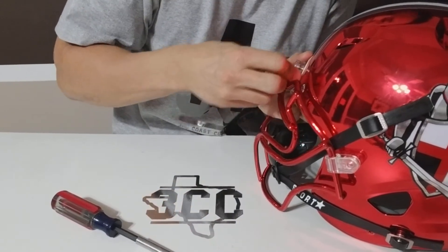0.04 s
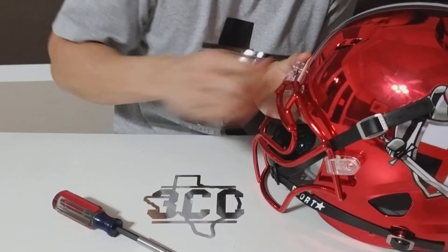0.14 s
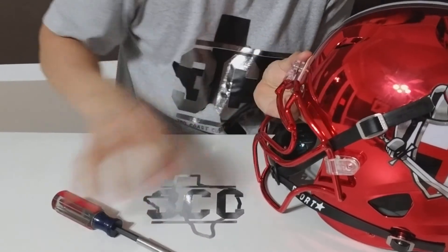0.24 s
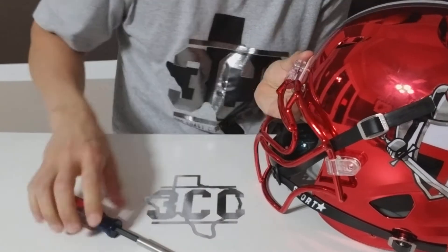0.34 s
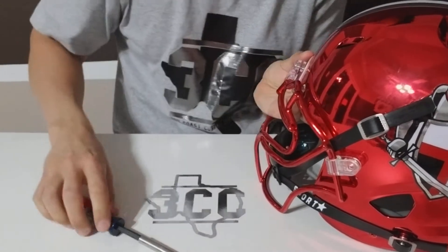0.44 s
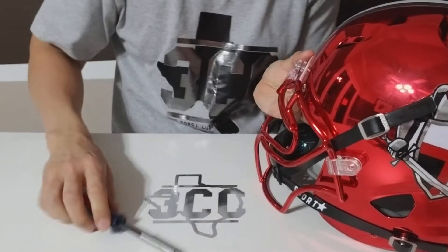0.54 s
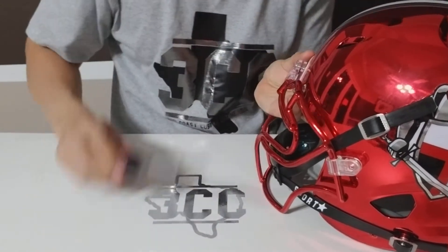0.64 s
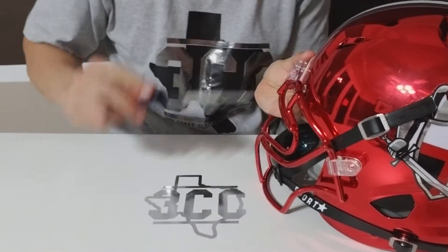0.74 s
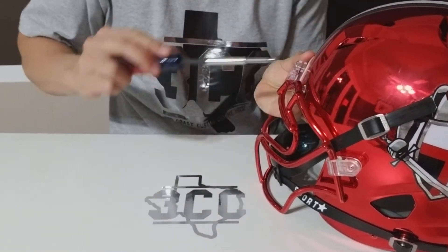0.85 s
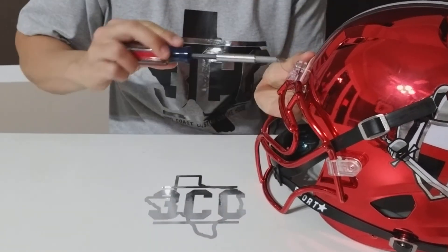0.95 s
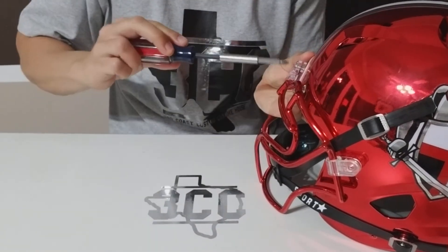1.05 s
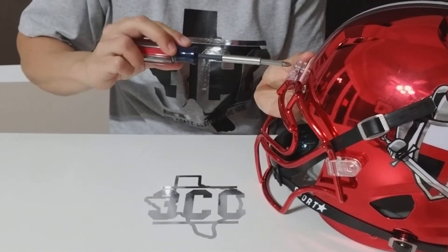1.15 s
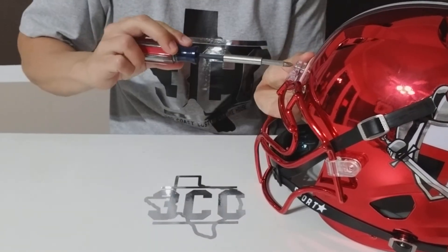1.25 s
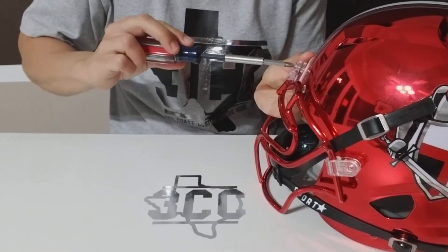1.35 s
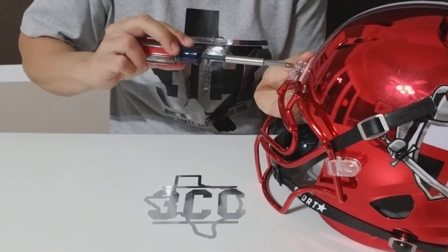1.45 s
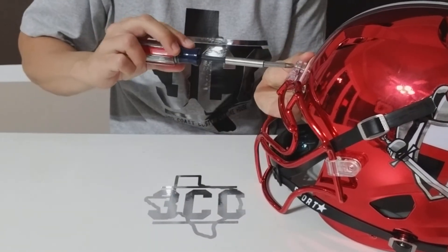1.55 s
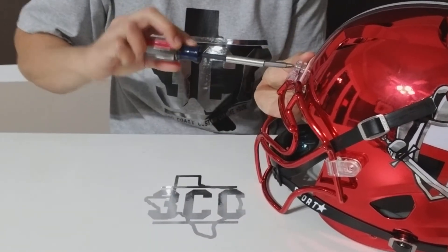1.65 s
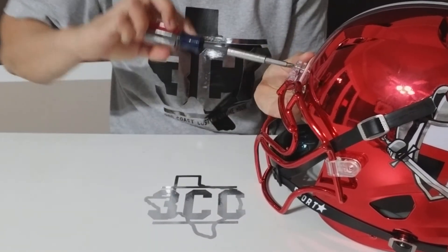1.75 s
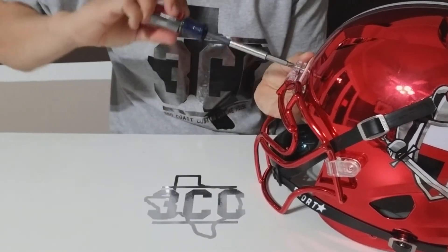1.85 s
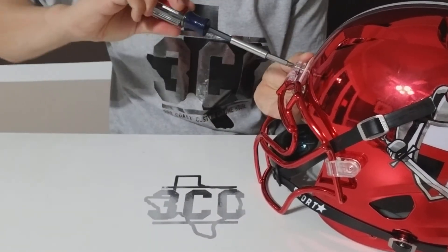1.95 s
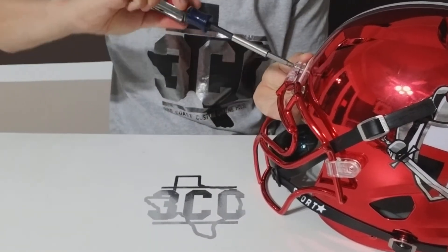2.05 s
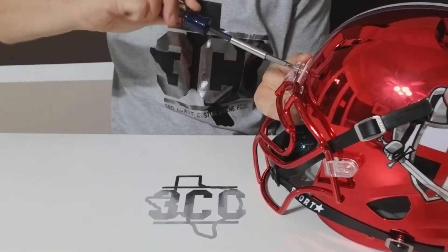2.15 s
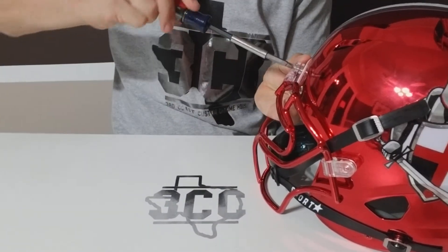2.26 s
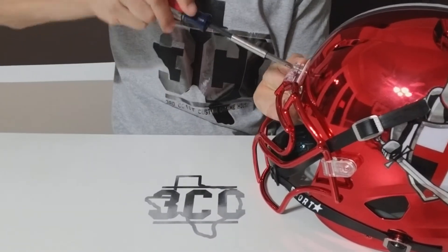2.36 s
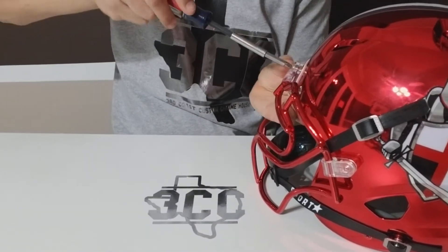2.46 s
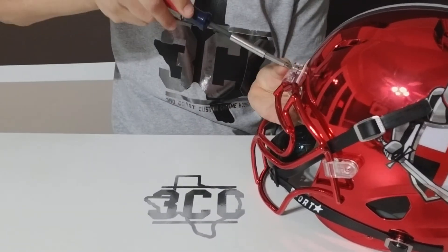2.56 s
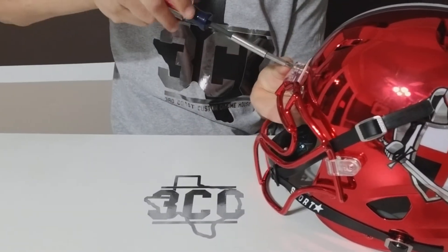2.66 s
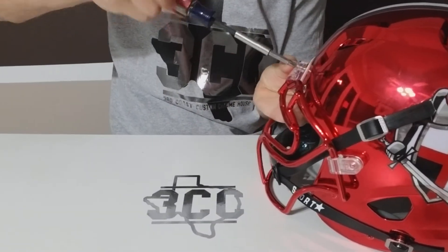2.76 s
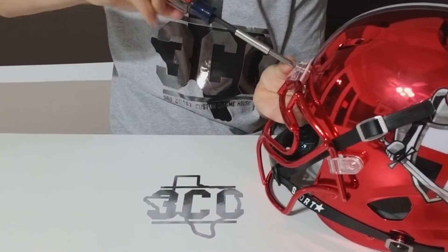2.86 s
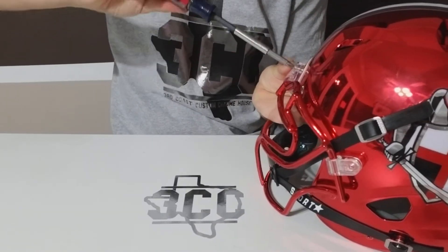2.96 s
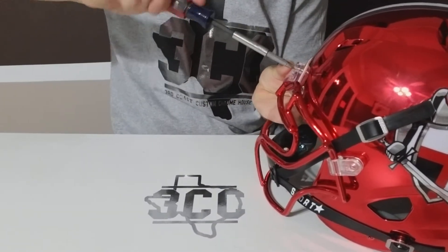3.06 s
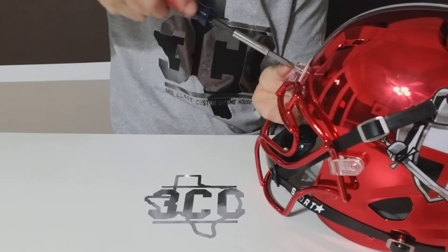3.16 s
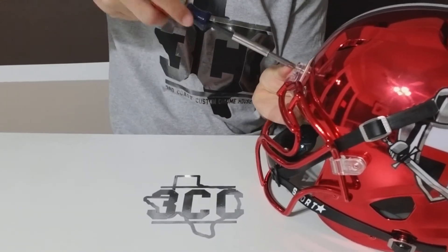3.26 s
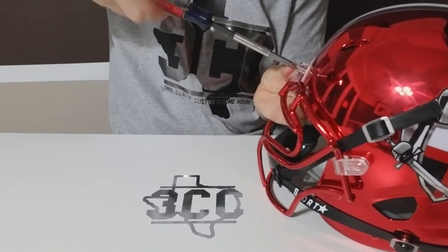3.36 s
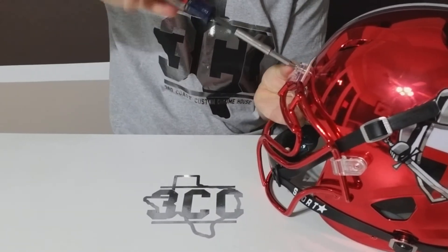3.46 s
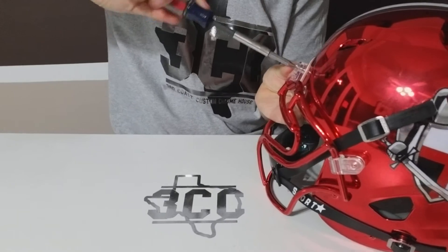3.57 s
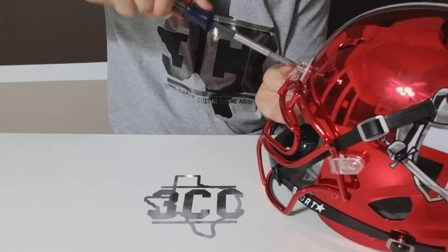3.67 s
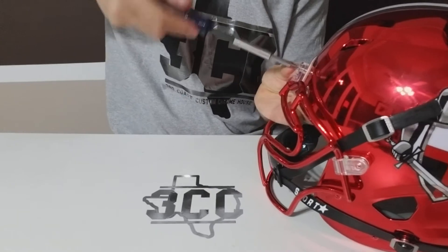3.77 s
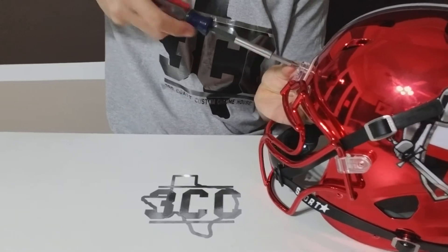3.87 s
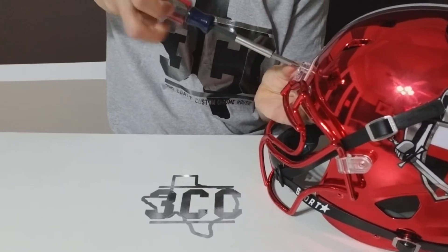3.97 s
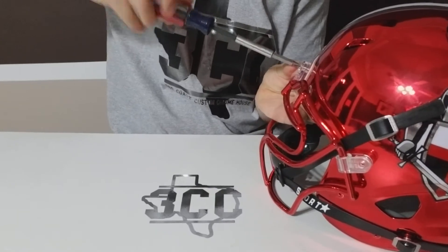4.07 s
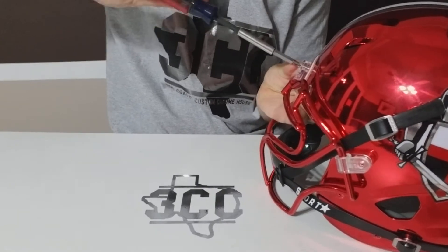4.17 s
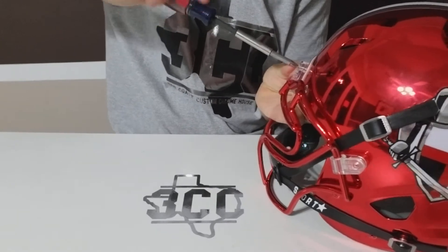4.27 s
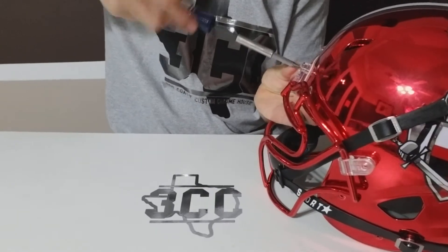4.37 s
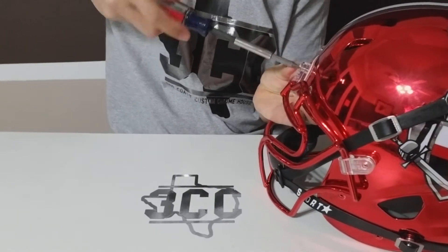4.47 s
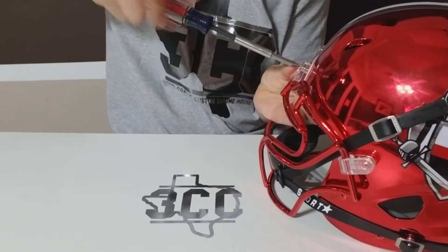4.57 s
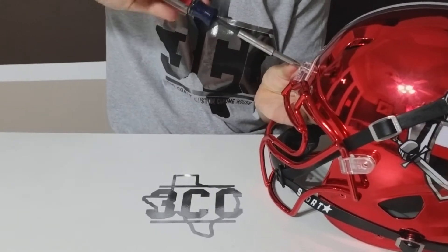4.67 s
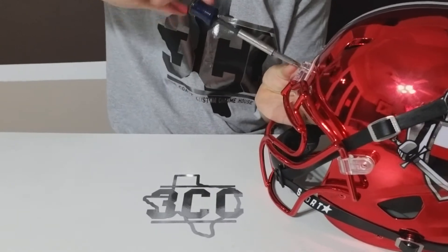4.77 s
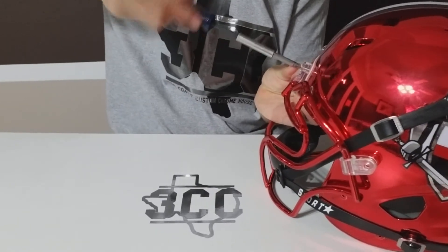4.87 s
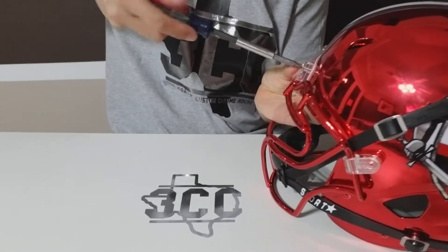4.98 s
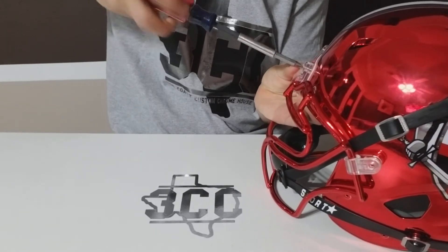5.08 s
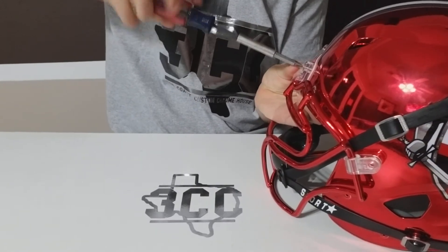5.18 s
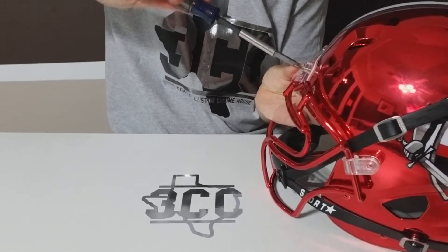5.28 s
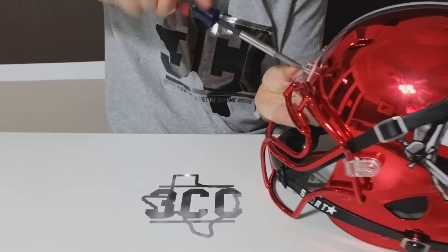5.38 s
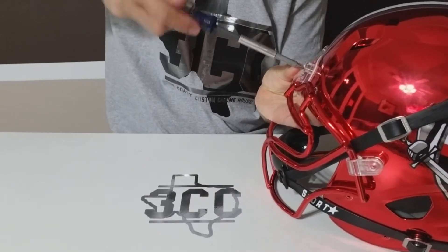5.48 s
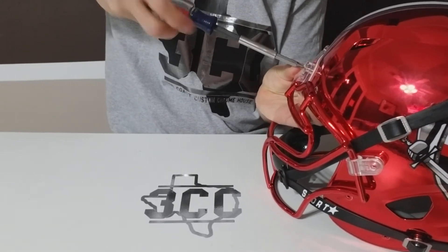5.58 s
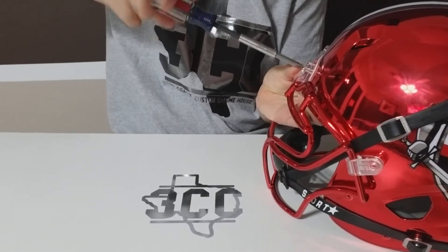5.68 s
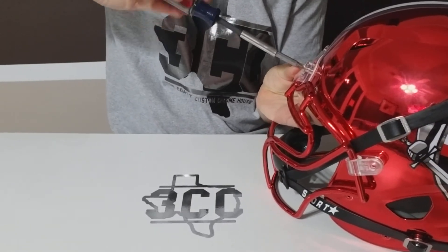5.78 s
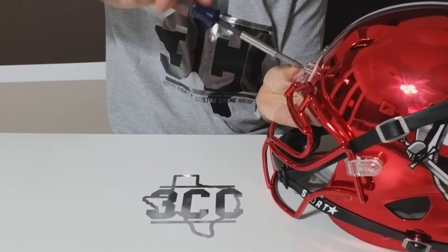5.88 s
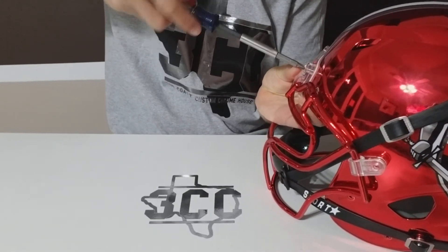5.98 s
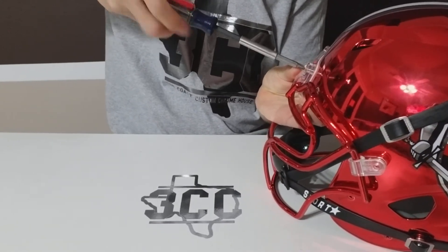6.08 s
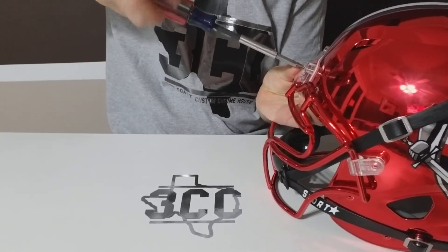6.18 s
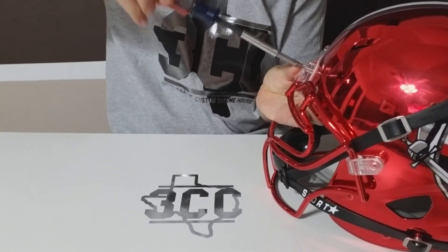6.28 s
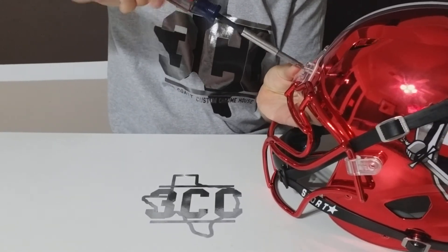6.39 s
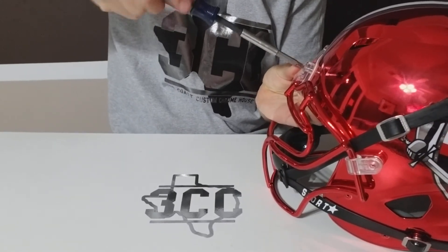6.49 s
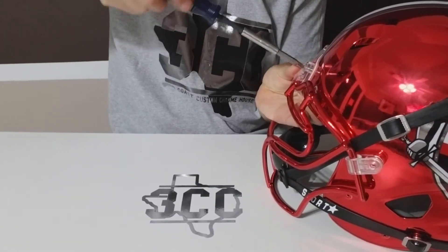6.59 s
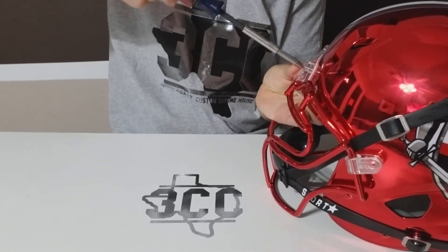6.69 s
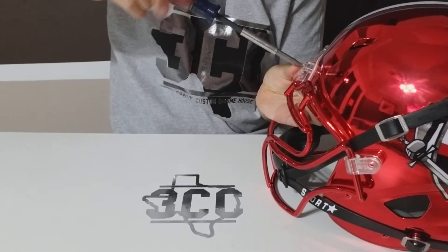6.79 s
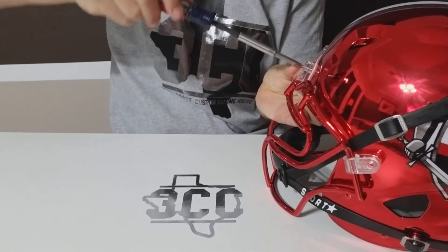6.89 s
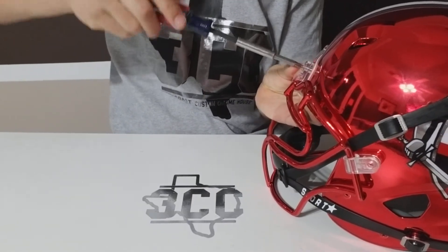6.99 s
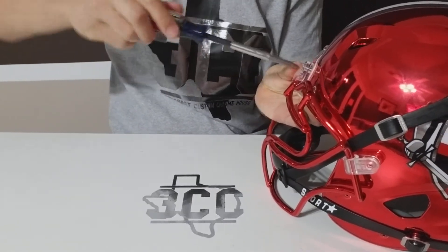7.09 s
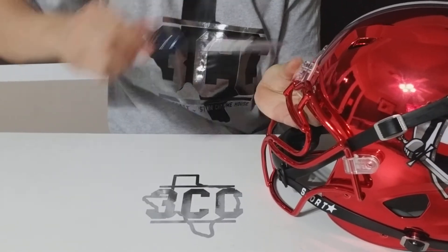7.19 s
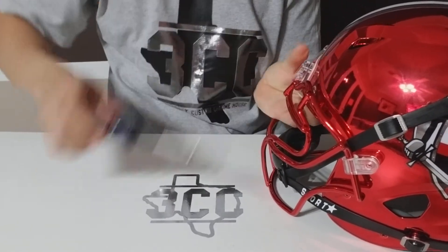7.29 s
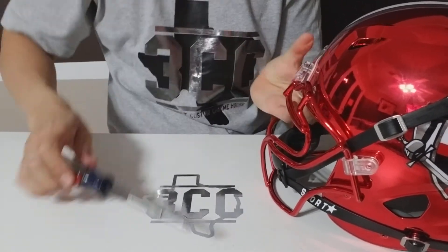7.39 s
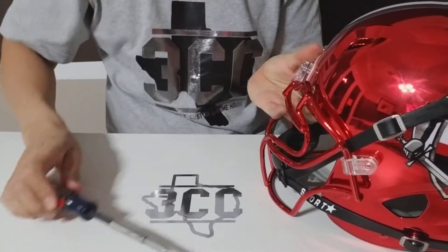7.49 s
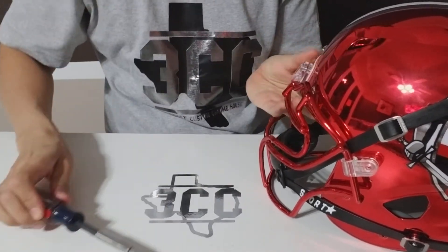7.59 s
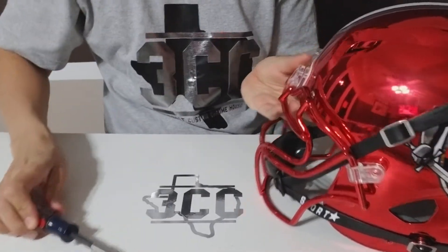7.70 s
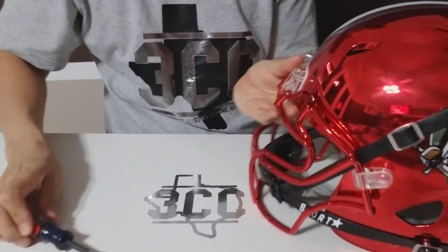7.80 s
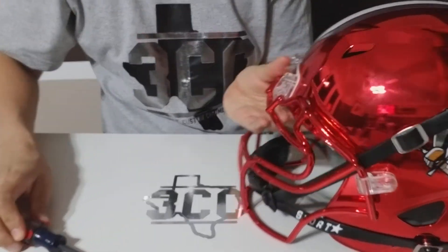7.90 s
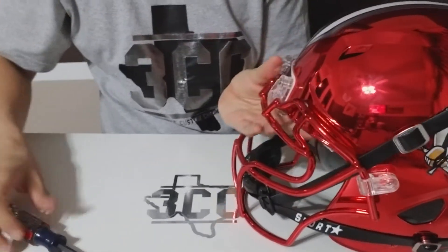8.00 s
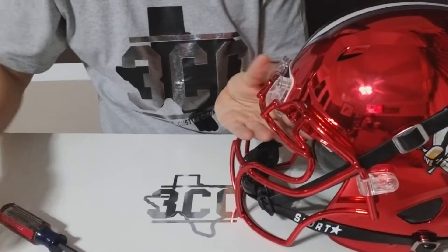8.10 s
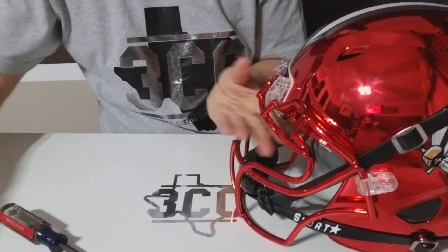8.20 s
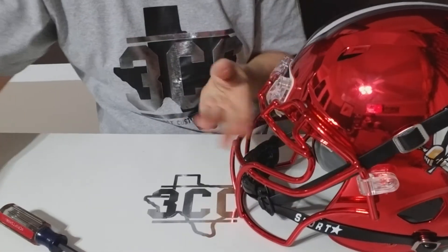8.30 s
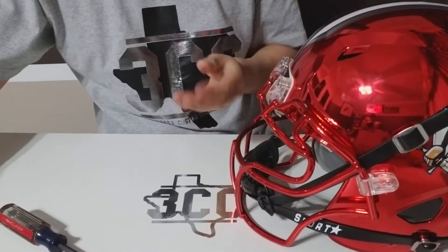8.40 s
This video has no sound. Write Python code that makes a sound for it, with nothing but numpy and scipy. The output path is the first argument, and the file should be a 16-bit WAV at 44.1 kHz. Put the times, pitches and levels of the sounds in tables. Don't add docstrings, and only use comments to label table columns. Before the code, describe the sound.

A screwdriver is picked up from a hollow table, scrapes and clicks a screw into a plastic helmet clip, then drops back with a ringing clatter.

```python
import sys
import numpy as np
from scipy import signal
from scipy.fft import rfft, irfft
from scipy.io import wavfile

SR = 44100
rng = np.random.default_rng(int(sys.argv[2]) if len(sys.argv) > 2 else 0)


def gain_from_db(level_db):
    decades = np.asarray(level_db, float) / 20
    return 10 ** decades


def int16_out(signal):
    q = np.round(np.clip(np.atleast_2d(signal).T, -1, 1) * 32767)
    wavfile.write(sys.argv[1], SR, q.astype(np.int16))


N = 372644
DECADES = np.log(1000)
SIDE = np.array([[0.5], [-0.5]])


def level(x, db):
    return x * gain_from_db(db) / np.sqrt(np.mean(x ** 2))


def colour(x, spectrum):
    hz, db = np.transpose(spectrum)
    grid = np.linspace(1, SR / 2, 2049)
    log_gain = np.interp(np.log(grid), np.log(np.maximum(hz, 1)), db) * DECADES / 60
    cepstrum = irfft(log_gain)
    cepstrum[1:2048] *= 2
    cepstrum[2049:] = 0
    h = irfft(np.exp(rfft(cepstrum)))
    return signal.oaconvolve(x, h / np.sqrt(np.sum(h ** 2)))[:len(x)]


def ring(x, modes, share=1):
    t = np.arange(SR // 4) / SR
    h = np.zeros(len(t))
    for k, (hz, db, t60) in enumerate(modes):
        fade = np.exp(-DECADES * t / (min(t60, 0.2) * share))
        h += (-1) ** k * gain_from_db(db) * np.sin(2 * np.pi * hz * t) * fade
    return signal.oaconvolve(x, h / np.abs(h).max())[:len(x)]


def strikes(s, db):
    x = np.zeros(N)
    np.add.at(x, np.minimum((np.asarray(s) * SR).astype(int), N - 1), gain_from_db(np.asarray(db)))
    return x


def burst(x, t60):
    fall = np.exp(-DECADES / (t60 * SR))
    rise = fall ** 8
    envelope = signal.lfilter([1.4 * (1 - rise)], np.convolve([1, -fall], [1, -rise]), x)
    return envelope * rng.standard_normal(len(x))


def grains(rate, spread_db, t60):
    size = np.minimum(rng.exponential(size=N), 4)
    starts = rng.random(N) < rate / SR
    return level(burst(starts * gain_from_db(spread_db * size), t60), 0)


def swells(s, rise, fall, db):
    swell_db = 25
    t = np.arange(0, N, 64) / SR
    late = t[:, None] - s
    efforts = db - swell_db * np.maximum(late / np.abs(fall), -late / np.abs(rise))
    return np.interp(np.arange(N) / SR, t, np.max(efforts, axis=1))


# [fastest t/s, rise t/s, fall t/s, scrape level/dB, brightness level/dB]
TWISTS = [(0.6, 0.28, 0.61, -72, 3), (1.955, .03, .1, -74, 14), (2.0, 0.052, 0.37, -52.5, -5),
          (2.33, 0.04, 0.14, -63.5, -8), (2.798, 0.19, 0.14, -75, -2), (2.99, 0.22, 0.32, -59.5, 2),
          (3.2, .5, 1, -75.5, 2), (3.671, 0.41, 0.18, -55.5, -2), (4.298, 0.22, 0.25, -58.5, -2),
          (4.75, .1, 0.066, -68, 8), (4.793, 0.2, 0.13, -56, 7), (5.193, 0.048, 0.61, -64, -10),
          (5.338, 0.33, 0.56, -65, 2), (5.713, 0.021, 0.39, -64.5, 14), (5.859, 0.11, 0.083, -48, -9),
          (6.226, 0.066, 0.45, -64, -11), (6.402, 0.42, 0.15, -83, 22), (6.64, .04, 0.32, -70.5, 10),
          (6.735, 0.067, 0.12, -63, 16.5), (6.994, 0.067, 0.09, -63, -17), (7.706, 0.02, 0.19, -43.5, -9)]
# [t/s, peak level/dB, brightness level/dB, shaft ring
# level/dB]
SLIPS = [(0.0005, -50, -15, -25), (1.966, -43, 5, 12), (2.0146, -45, -20, 5), (2.031, -32, -8.5, 0.5),
         (2.042, -36.5, -28, -0.5), (2.81, -41, -15, -15), (2.966, -57, 7, 11), (3.0089, -45, -24, 6),
         (3.079, -35.5, -8, -42), (3.394, -51.5, -3.5, 13), (3.6153, -47, -1, -20), (3.619, -44, -6, -12),
         (3.6485, -34.5, -8, -1), (3.6659, -34, -11, 14), (4.231, -49.5, -1, 22), (4.2605, -62, 15.5, -21),
         (4.2722, -43.5, -20, 2), (4.291, -46.5, 9, 2), (4.301, -64, 11, -10), (4.763, -36.5, -13, 6),
         (4.773, -30, -6.5, 1), (4.788, -41.5, -33, -6), (4.831, -46, -6, -1), (5.3068, -47, -6, 17),
         (5.343, -45.5, -1.5, 25), (5.4196, -55.5, 4, -29), (5.856, -35, 0.5, 16),
         (5.9627, -50.5, 6.5, -15.5), (6.203, -43, -28, -5), (6.423, -44.5, -10.5, -4),
         (6.629, -47.5, -6.5, -9), (6.6757, -38, -16, -14), (6.724, -47, 11, 1),
         (1.446, -69, -15, 1), (1.605, -73, -20, 2), (1.622, -63.5, -17, 7), (1.698, -63.5, -15, 19),
           (2.274, -67.5, -2, -5), (2.763, -50.5, -9, -14), (2.956, -57, -1, -5), (3.232, -60, -10, 3),
           (3.301, -59, -8, -5), (3.382, -56, -5, 1), (3.606, -58, -7, -5), (4.392, -57, -5, 0),
           (2.326, -59.5, -3, -5), (4.661, -59, -14, 4), (4.683, -61, -13, 5), (4.742, -67, -15, 10),
           (4.805, -55, -8, -7), (5.372, -63, 1, -2), (5.752, -59, 4, -5), (1.3146, -60, -31, 10),
           (2.3155, -48, -25, -5), (2.9277, -50.5, -22, 20.5), (2.989, -61, 9, -3), (3.048, -52, -4, 7),
           (3.0622, -53, 4, -18), (3.684, -44.5, -16.5, 0), (3.8038, -54, -8, -12), (4.131, -54, -4, -14),
           (4.195, -53.5, -9, -6), (4.93, -52, -19, -1), (5.175, -51.5, -24, 13), (5.333, -50, 2, -15),
           (5.366, -44.5, 1.5, -22), (5.471, -56.5, -23, 15), (5.851, -42, -3, 3), (5.871, -56, 1, 5),
           (6.309, -47, -21, -5), (6.3663, -50, -9, -1), (6.397, -54.5, 9, -6), (6.52, -62, -15, 0),
           (6.684, -42.5, -11, -7.5), (6.973, -55, -14, -8), (7.009, -65.5, -14, -3), (7.11, -64.5, 7, -18)]
# [t/s, peak level/dB]
PINGS = [(2.0296, -24), (2.045, -61), (2.761, -49), (2.965, -40.5), (3.0765, -45), (3.396, -73),
         (3.648, -26.5), (3.8035, -43), (4.231, -42), (4.271, -31.5), (4.29, -33.5), (4.299, -39),
         (4.339, -32.5), (4.7711, -28.5), (5.346, -31.5), (5.3666, -53), (5.4185, -35.5), (5.8555, -28.5),
         (5.963, -36.5), (6.424, -54)]
# [t/s, peak level/dB]
SHAFT_BLOWS = [
    (1.967, -45),
    (2.03, -38),
    (2.045, -29.5),
    (2.068, -52),
    (2.81, -54),
    (3.649, -56),
    (3.667, -60),
    (4.786, -34.5),
    (5.872, -46),
]
# [f/Hz, level/dB]
SPIT = [(1500, -21), (3000, -2), (4500, 2), (5800, -1.5), (7000, 0.5), (8600, -5), (9800, -3.5),
        (13000, -17)]
# [f/Hz, level/dB]
SCRAPE = [(1500, -22), (3000, -10), (4000, 3.5), (5500, -1.5), (7300, 3.5), (8600, -4.5), (9800, 0.5),
          (13000, -15.5)]
# [f/Hz, level/dB]
FIZZ = [(7000, -15), (10000, 0), (12500, 0.5), (14500, -1), (15400, -1), (16200, -24), (17000, -48.5)]
# [f/Hz, level/dB]
SQUEAK = [(7000, -27.5), (9600, -12.5), (11000, -2), (13000, -2), (14500, -5.5), (15800, -9), (16700, -43)]
# [f/Hz, level/dB, t60 t/s]
TIP = [(8650, 0, 0.006), (3600, -6, .004), (9300, -8, .004), (6800, -9, .004)]
# [f/Hz, level/dB, t60 t/s]
SHAFT = [(1950, -20, .008), (2560, -20, 0.018), (2440, -12, 0.009), (4200, -22, .008)]
# [f/Hz, level/dB]
SCUFF = [(2000, -9), (3000, -14), (3800, 1.5), (4600, 0.5), (5800, -9.5), (7000, -21), (10000, -33.5)]
# [f/Hz, level/dB]
SHELL = [(300, -30), (520, -3.5), (1000, -7), (1500, -4.5), (2100, -6.5), (3000, -15.5), (4500, -22),
         (8000, -49)]


def screw():
    *twist, scrape_db, twist_bright_db = np.transpose(TWISTS)
    squeak_db = swells(*twist, scrape_db + twist_bright_db)
    scrape_db = swells(*twist, scrape_db)
    s, db, bright_db, ring_db = np.transpose(SLIPS)
    shaft_db = db + np.minimum(ring_db, 2)

    patches_per_s, patchy_db = 55, 4.5
    grip = rng.standard_normal(N * patches_per_s // SR + 2)
    patch = np.interp(np.arange(N) * patches_per_s / SR, np.arange(len(grip)), grip)
    scrape_db = scrape_db + patchy_db * patch
    grit = grains(1500, 3.2, 0.004)

    slide = np.hanning(70) / 30
    hit = strikes(s, db)
    spit = burst(np.convolve(hit, slide, "same"), 0.013)
    fizz = burst(np.convolve(strikes(s, db + bright_db), slide, "same"), 0.013)

    body = gain_from_db(-3.5) * colour(spit, SPIT)
    body += colour(gain_from_db(scrape_db - 6.5) * grit, SCRAPE)
    body += gain_from_db(-27.0) * ring(burst(hit, 0.00039) + gain_from_db(scrape_db - 12.0) * grit, TIP)
    body += gain_from_db(-14.0) * ring(burst(strikes(*np.transpose(PINGS)), 0.0027), TIP)
    body += gain_from_db(-21) * ring(burst(strikes(s, shaft_db), 0.012), SHAFT)
    body += ring(strikes(*np.transpose(SHAFT_BLOWS)), SHAFT)
    body += gain_from_db(-10.5) * colour(burst(strikes(s, shaft_db), 0.017), SCUFF)
    body += gain_from_db(-20.0) * colour(burst(strikes(s, db + ring_db), 0.014), SHELL)
    top = gain_from_db(-3.0) * colour(fizz, FIZZ) + colour(gain_from_db(squeak_db - 13.5) * grit, SQUEAK)
    return body, top


# [t/s, peak level/dB, tick level/dB, shaft ring level/dB]
RATTLE = [(0.6424, -55, -6, -9.5), (0.6714, -49.5, -4.5, -10), (0.686, -54.5, -2.5, -22),
          (0.7623, -67.5, -1, -17), (0.7682, -62.5, -2.5, -9), (0.8123, -58, -3, -20),
          (0.8212, -64, -5, -9), (0.8685, -59, -6, -13), (0.9173, -53, -8.5, -31), (0.9752, -66.5, -5, -15),
          (1.0131, -58.5, -3, -14.5), (1.0244, -73, -7, -14), (1.132, -60, -10.5, -21.5),
          (1.163, -69.5, -11, -22)]
# [t/s, peak level/dB, tick level/dB, shaft ring level/dB]
RELEASE = [
    (7.111, -56, -0.5, -15),
    (7.134, -58, -4.5, -25),
    (7.165, -64, -3, -25),
    (7.1974, -69.5, 1.5, -17),
    (7.2472, -71, -2, -12.5),
    (7.3345, -76, -1, -2),
    (7.3602, -59, -2.5, -20.5),
    (7.3695, -63.5, -15.5, -18.5),
]
# [f/Hz, level/dB]
TICK = [(3500, -34.5), (5300, -7.5), (6900, -3.5), (8000, -10.5), (10000, -17), (16000, -20)]
# [f/Hz, level/dB, t60 t/s]
BIT = [(4484, 6.5, 0.016), (4350, 4, 0.003), (4720, -22, 0.0054)]


def rattle():
    s, db, tick_db, shaft_db = np.transpose(RATTLE + RELEASE)
    tick = colour(burst(strikes(s, db + tick_db + 10.5), 0.0077), TICK)
    bit = ring(burst(strikes(s, db - 7.5), 0.0075), BIT)
    shaft = ring(burst(strikes(s, db + shaft_db - 1.5), 0.004), SHAFT[1:3])
    return bit + shaft + tick


# [t/s, peak level/dB, table pitch f/Hz, shell knock level/dB]
HANDLING = [(0.01, -34.5, 111, -65), (0.084, -36, 312, -81), (0.129, -38, 99, -77), (0.175, -37, 180, -67),
            (0.286, -54, 308, -68), (0.389, -26.5, 393, -46), (0.408, -33.5, 450, -45),
            (0.441, -44, 420, -48), (0.498, -41, 178, -33), (1.316, -44.5, 252, -60),
            (1.333, -45, 172, -59), (1.442, -43.5, 112, -62.5), (1.606, -36, 178, -52.5),
            (1.698, -37, 176, -55.5), (2.313, -46, 370, -43), (2.528, -42.5, 270, -81),
            (2.771, -22.5, 198, -49), (2.787, -29.5, 129, -73), (5.12, -42, 173, -95),
            (5.43, -37.5, 200, -67), (6.512, -38, 295, -49.5), (6.968, -30.5, 325, -40),
            (7.106, -47.5, 190, -60), (7.344, -34.5, 193, -66.5), (7.55, -34.5, 250, -58.5),
            (7.566, -18.5, 202, -44), (7.679, -21, 216, -31), (7.819, -17.5, 263, -43),
            (7.899, -19, 301, -41.5), (8.214, -48.5, 165, -85)]
# [t/s, peak level/dB, shell knock level/dB]
RIM = [(2.733, -38.5, -58), (2.808, -60, -39), (3.097, -40.5, -49), (3.523, -33, -44.5),
       (3.611, -77, -40.5), (4.114, -38, -59), (4.165, -32.5, -65), (4.33, -30, -70), (4.407, -33, -52.5),
       (4.781, -30.5, -37), (5.171, -32, -41), (5.31, -25, -43.5), (5.483, -36, -50.5), (5.686, -30, -44.5),
       (5.794, -39, -45.5), (5.811, -34.5, -51), (6.073, -36, -102), (6.2, -25, -36), (6.238, -59, -42),
       (6.311, -30.5, -41), (6.386, -38.5, -54), (6.68, -23, -33), (6.897, -42.5, -45.5)]
# [t/s, peak level/dB, table pitch f/Hz]
ROCKS = [(2.106, -38.5, 101), (3.205, -34.5, 104), (3.327, -39.5, 91), (3.472, -37.5, 83),
         (3.652, -28, 100), (3.684, -31.5, 103), (3.743, -32, 115), (3.778, -27.5, 114), (4.198, -37.5, 90),
         (4.682, -35.5, 78.5), (4.893, -29.5, 94.5), (5.865, -28, 116), (5.927, -40.5, 102),
         (7.831, -22.5, 124), (8.23, -57, 103)]
# [f/Hz, level/dB, t60 t/s]
BOARD = [(113, -13.5, 0.018), (291.4, -0.5, 0.076), (352.7, 8.5, 0.016), (450, 4.5, 0.022),
         (636, -3.5, 0.008), (753, -0.5, 0.019), (973, -5, 0.035)]
# [f/Hz, level/dB]
TABLE = [(24, -60), (50, -7.5), (115, 4), (150, -9.5), (184, 0), (469, -14), (640, -26), (1980, -78)]


def thumps():
    rim_hz, rock_knock_db, hardest_knock_db = 190, -19.5, -33
    blows = list(HANDLING)
    blows += [(s, db, rim_hz, knock_db) for s, db, knock_db in RIM]
    blows += [(s, db, hz, db + rock_knock_db) for s, db, hz in ROCKS]
    out = np.zeros(N + SR)
    t = np.arange(SR // 5) / SR
    swell = 1.4 * (1 - np.exp(-t / 0.003))
    for s, db, hz, _ in blows:
        i = int(s * SR)
        fade = np.exp(-DECADES * t / (0.045 + 2.0 / hz))
        out[i:i + len(t)] -= gain_from_db(db) * swell * np.sin(2 * np.pi * hz * t) * fade

    s, db, _, knock_db = np.transpose(blows)
    push = np.convolve(strikes(s, db - 7), np.hanning(60) / 30)[:N]
    knock = strikes(s, np.minimum(knock_db, hardest_knock_db) - 4.5)
    knock = np.convolve(knock, np.hanning(220) / 110, "same")
    after = colour(burst(strikes(s, db - 9.0), 0.11), TABLE)
    return out[:N] + ring(push, BOARD) + after, colour(burst(knock, 0.029), SHELL)


# [t/s, peak level/dB, treble #
# level/dB, share of full decay]
DROPS = [(0.395, -41.5, -56.5, 3.6), (0.411, -41.5, -45.5, 1.1), (0.444, -47.5, -49.5, 5.1),
         (0.5005, -10.5, -29.5, 0.055), (0.511, -44, -22, 0.3), (0.522, -51, -23, 0.4),
         (7.568, -37.5, -84, 2.4), (7.677, -5, -30, 0.75), (7.685, -11, -33.5, 0.63),
         (7.71, -15.5, -36, 0.4), (7.82, -21.5, -56, 0.59), (7.839, -26, -35.5, 0.39),
         (7.94, -35.5, -42.5, 0.65), (7.899, -38.5, -43, 2.6)]
# [f/Hz, level/dB]
CRACK = [(140, -38), (260, -8.5), (900, -4), (2100, -3.5), (3300, -5.5), (4400, -15), (5600, -28),
         (16500, -48)]
# [f/Hz, level/dB, t60 t/s]
TOP = [(634, -1.5, 0.29), (1050, -10, 0.25), (1158, -19.5, 0.4), (1303, -9, 0.4), (1398, -5, 0.22),
       (1583, -0.5, 0.3), (1530, -0.5, .3), (1850, -11, .4), (2070, 2.5, 0.28), (2208, -1.5, .25),
       (2772, -7.5, 0.45), (3220, -12.5, 0.25), (3714, -4.5, 0.27), (4100, -9, 0.2)]


def drops():
    scatter_db = 4
    out = np.zeros(N + SR)
    hit = np.arange(SR // 2) == 0
    for s, db, treble_db, share in DROPS:
        chance = rng.standard_normal(len(TOP))
        top = [(hz, gain + scatter_db * z, t60) for (hz, gain, t60), z in zip(TOP, chance)]
        softness = [(300, 0.0096), (900, 0.014), (16000, 3.56 * (treble_db + 32.0))]
        crack = gain_from_db(-5.5) * colour(burst(hit, 0.051 * share), CRACK)
        crack += gain_from_db(-21) * ring(burst(hit, 0.0045), top, 0.26 * share)
        i = int(s * SR)
        out[i:i + len(hit)] += gain_from_db(db) * colour(crack, softness)
    return out[:N]


def spread(x):
    scatter = burst(np.arange(SR // 20) == 0, 0.0064)
    scattered = signal.oaconvolve(x, scatter / np.sqrt(np.sum(scatter ** 2)))[:N]
    return colour(scattered, [(100, -29.5), (500, -6.5), (2000, -2), (4000, -2), (16000, -3.5)])


# [t/s, peak level/dB, f/Hz, t60 t/s]
NOTES = [
    (0.096, -56, 1020, 0.073),
    (0.166, -62, 1050, 0.063),
    (0.237, -67, 1055, 0.051),
    (.284, -51.5, 960, 0.022),
    (0.443, -29.5, 449, 0.074),
    (7.897, -22, 299.4, 0.11),
]


def notes():
    out = np.zeros(N)
    for s, db, hz, t60 in NOTES:
        t = np.maximum(np.arange(N) / SR - s, 0)
        envelope = (1 - np.exp(-t * hz / 2)) * np.exp(-DECADES * t / t60)
        out += gain_from_db(db) * envelope * np.sin(2 * np.pi * hz * t)
    return out


# [strongest t/s, rise t/s, table rumble level/dB, shell rubbing level/dB]
PUSHES = [(0.0, .1, -35.5, -55), (0.07, .3, -41.5, -64), (0.17, 0.26, -47.5, -65), (0.43, 0.23, -41, -56),
          (1.34, 0.088, -58, -72), (1.631, 0.17, -46.5, -57), (2.03, 0.084, -41, -70),
          (2.15, 0.18, -48, -53), (2.35, 0.49, -50.5, -58), (2.798, 0.29, -37, -66), (3.05, 1, -50.5, -55),
          (3.229, 0.17, -43.5, -52.5), (3.671, 0.76, -44, -53.5), (3.786, 0.48, -44, -75),
          (4.296, 0.38, -39.5, -46.5), (4.793, 0.39, -40, -43), (5.193, 1, -52, -63.5),
          (5.3, 0.13, -38, -51), (5.725, 0.019, -55, -40), (5.872, 0.51, -44, -50),
          (6.226, 0.054, -49, -50), (6.402, 1, -50, -53.5), (6.535, 0.074, -45.5, -50.5),
          (6.709, 0.15, -44.5, -46.5), (6.994, 0.11, -50.5, -76), (7.373, 0.036, -55.5, -77),
          (7.58, 0.036, -35, -40.5), (7.64, 0.073, -35, -41), (7.706, 0.04, -35.5, -45),
          (7.881, 0.062, -35.5, -61), (8.26, 0.056, -59.5, -80)]


def pushes():
    s, rise, rumble_db, shell_db = np.transpose(PUSHES)
    rumble_db = swells(s, rise, 0.19, rumble_db)
    shell_db = swells(s, 0.75 * rise, 0.046, shell_db)
    rumble = colour(gain_from_db(rumble_db - 3.5) * grains(400, 5, 0.01), TABLE)
    rubbing = colour(gain_from_db(shell_db - 15.0) * grains(760, 2.3, 0.025), SHELL)
    return rumble, rubbing


# [t/s, level/dB, treble level/dB]
DRAG = [
    (8.335, -94.5, -18),
    (8.355, -53.5, -4.5),
    (8.385, -47, -12.5),
    (8.45, -65.5, -38),
]


def drag():
    s, db, treble_db = np.transpose(DRAG)
    t = np.arange(N) / SR
    body_db = np.interp(t, s, db, left=-150)
    top_db = np.interp(t, s, db + treble_db, left=-150)
    grit = grains(1360, 2.4, 0.011)
    dull = [(300, -7.0), (800, -2.0), (1800, 1.5), (3500, 0.5), (5500, -13.5), (9000, -42.0)]
    return colour(grit * gain_from_db(body_db), dull) + colour(grit * gain_from_db(top_db), TICK)


# [t/s, peak level/dB, t60 t/s]
SCUFFS = [
    (1.316, -64.5, 0.13),
    (1.425, -73, 0.076),
    (1.62, -69, 0.072),
    (1.697, -77, 0.033),
    (2.318, -59.5, 0.098),
    (4.546, -67, 0.055),
    (5.865, -53, 0.13),
]


def scuffs():
    return colour(sum(burst(strikes([s], db), t60) for s, db, t60 in SCUFFS), SCUFF)


# [f/Hz, level/dB]
LEAN = [(1000, 3), (2500, 4.5), (4500, 2), (6500, 3.5), (8700, -4), (11000, 1.5), (16000, 3)]


def place_helmet(body, fizz):
    pair = np.array([colour(body, [(hz, k * db) for hz, db in LEAN]) for k in (1.5, -1.5)])
    pair = pair * gain_from_db(4.75 * SIDE) + fizz * gain_from_db(19.0 * SIDE)
    pair[1] = np.roll(pair[1], 6)
    return pair


# [f/Hz, t60 t/s, level/dB]
ROOM = [(138, 0.5, -2.5), (450, 0.33, 3), (1400, 0.32, 5.5), (3030, 0.29, 4.5), (5500, 0.3, -0.5),
        (10800, 0.13, 4)]


def room(x):
    t = np.arange(SR) / SR
    edges = [40] + [np.sqrt(a[0] * b[0]) for a, b in zip(ROOM, ROOM[1:])] + [18000]
    build = 1 - np.exp(-t / 0.009)
    tail = 0
    for lo, hi, (hz, t60, db) in zip(edges, edges[1:], ROOM):
        band = signal.butter(2, [lo, hi], "band", fs=SR, output="sos")
        mid, side = signal.sosfilt(band, rng.standard_normal((2, SR)))
        pair = mid + min(hz / 900, 1) ** 1.4 * side * np.array([[1], [-1]])
        fade = np.exp(-DECADES * t / t60) * np.sqrt(DECADES / (t60 * SR))
        tail = tail + gain_from_db(db) * pair * fade * build
    return signal.oaconvolve(x[None], tail, axes=1)[:, :N]


# [f/Hz, level/dB]
LINGER = [(200, -8), (450, 0), (720, 0.5), (1100, -10.5), (1600, -10.5), (2200, -23), (2800, -45),
          (8000, -65)]


def linger():
    fade = np.exp(-DECADES * np.arange(N) / SR / 0.34)
    return gain_from_db(-44) * fade * np.array([colour(rng.standard_normal(N), LINGER) for _ in range(2)])


# [f/Hz, level/dB]
HUM = [(25, 4.5), (70, 2.5), (120, 2), (182, -11.5), (313, -17.5), (550, -25.5), (2530, -36), (15700, -37)]


def hum():
    mid, side = (colour(rng.standard_normal(N), HUM) for _ in range(2))
    side = signal.sosfilt(signal.butter(1, 330, "high", fs=SR, output="sos"), side)
    hiss_top = signal.ellip(6, 0.5, 40, 15900, fs=SR, output="sos")
    return level(signal.sosfilt(hiss_top, [mid + side, mid - side]), -61.5)


def scene():
    body, fizz = screw()
    table, knock = thumps()
    rumble, rubbing = pushes()
    helmet = place_helmet(body + knock + rubbing + rattle() + scuffs(), fizz)
    table = table + notes() + rumble
    tool = drops()
    near = table * gain_from_db(1.8 * SIDE) + tool + gain_from_db(3.0) * SIDE * spread(tool) + drag()
    echo = room((near + gain_from_db(0.5) * helmet).mean(axis=0))
    return near + helmet + echo + hum() + linger()


def band_limit(x):
    return signal.sosfilt(signal.butter(12, 16670, fs=SR, output="sos"), x)


def record(dry):
    mix = signal.sosfilt(signal.butter(2, 55, "high", fs=SR, output="sos"), dry)
    return band_limit(mix)


dry = scene()
out = record(dry)
int16_out(out)
```